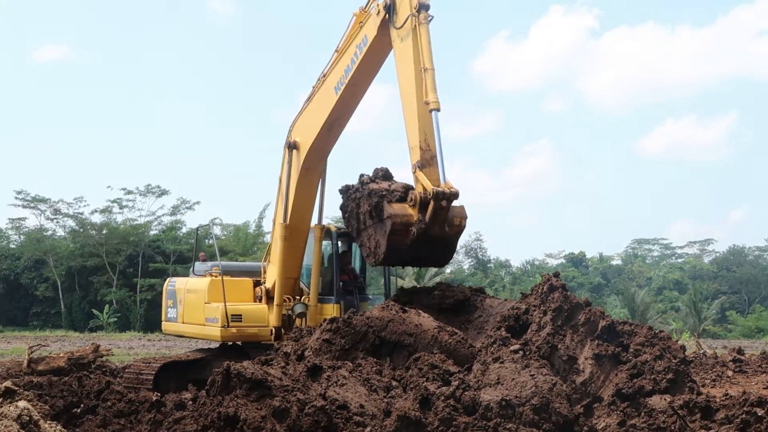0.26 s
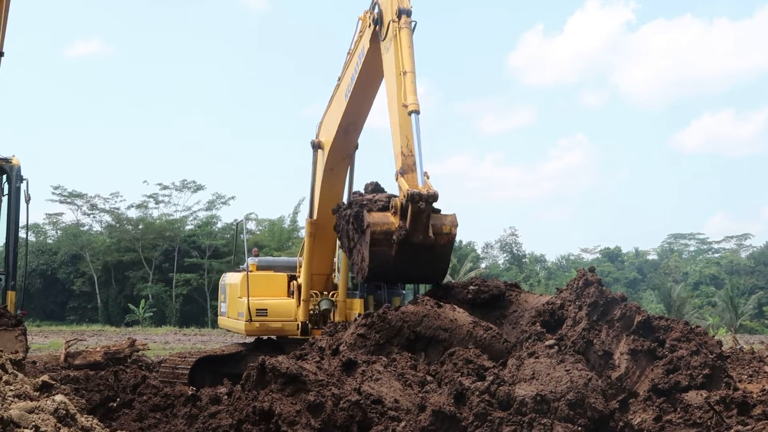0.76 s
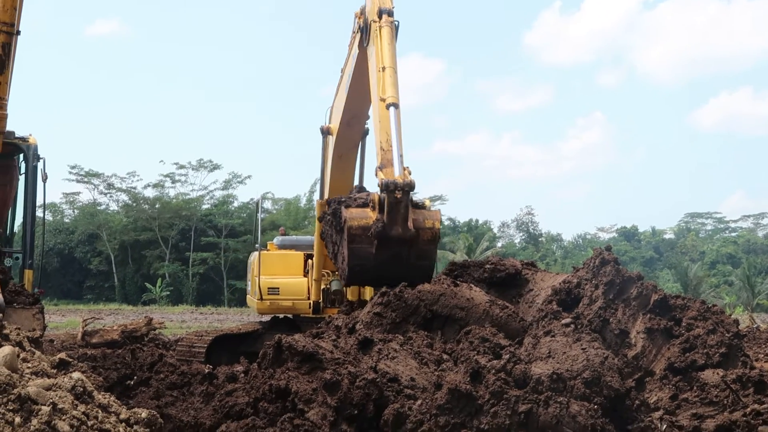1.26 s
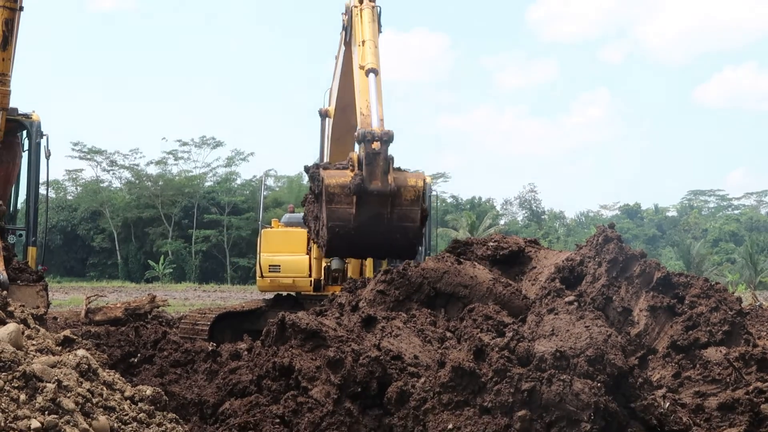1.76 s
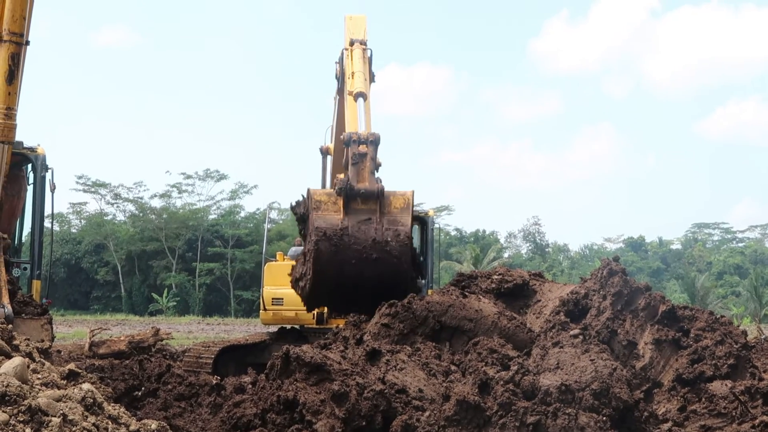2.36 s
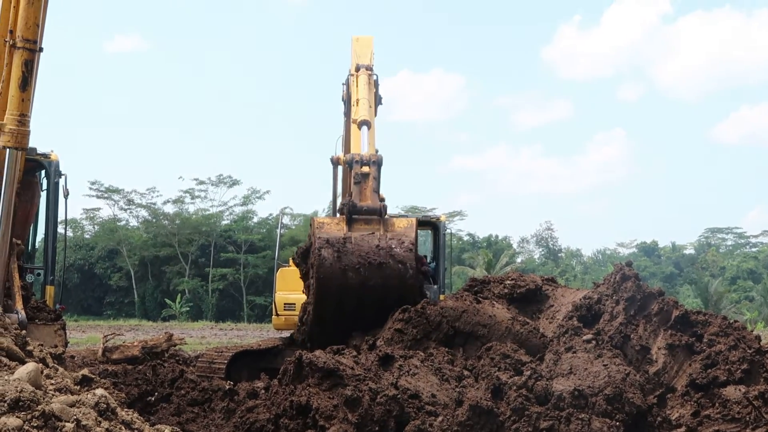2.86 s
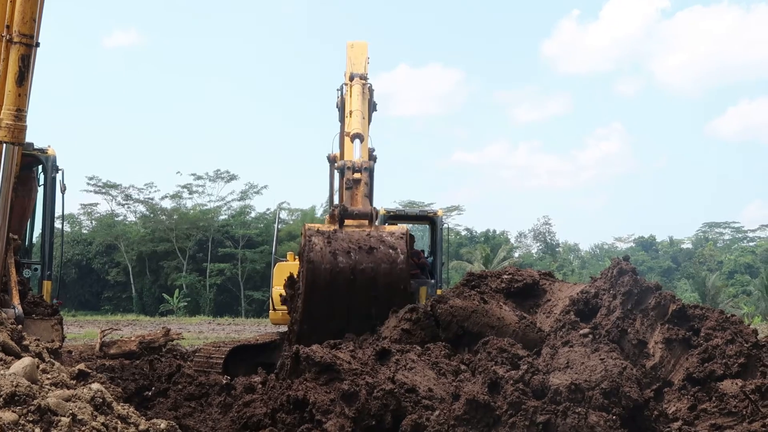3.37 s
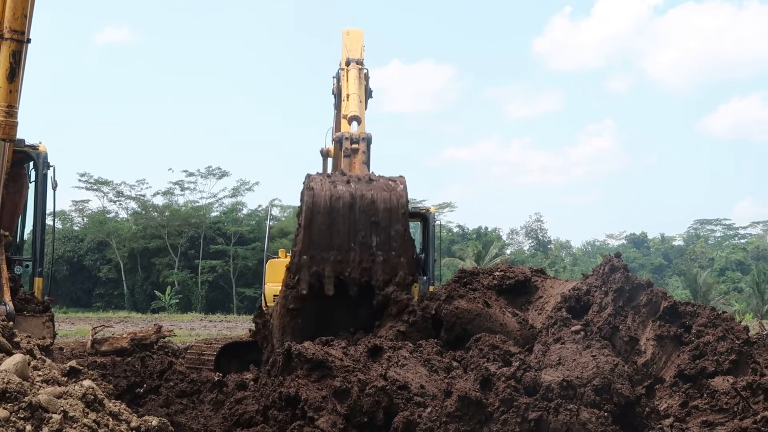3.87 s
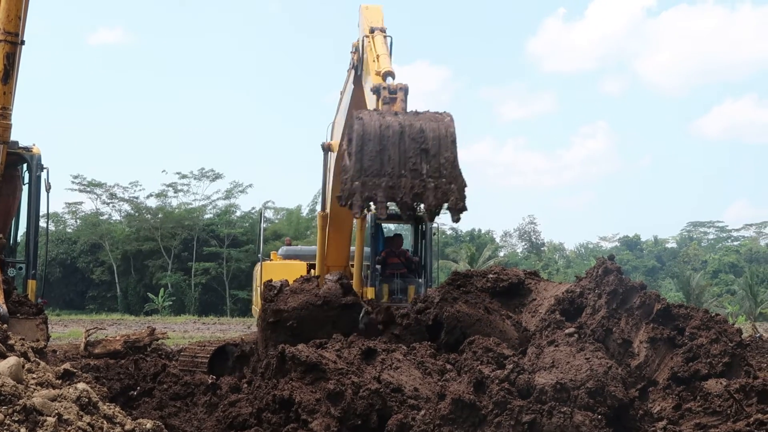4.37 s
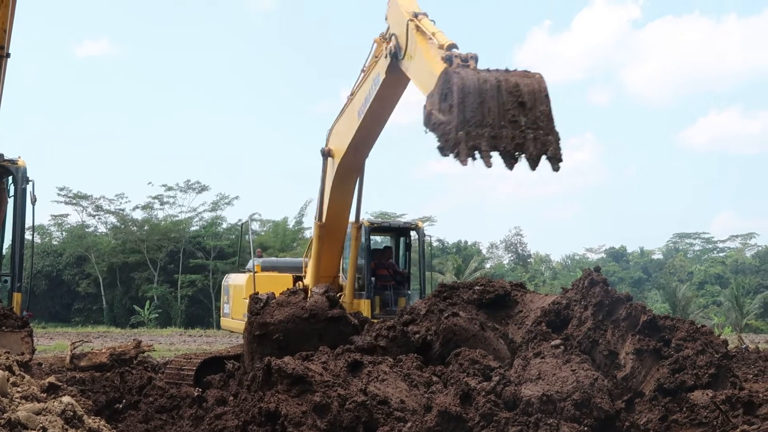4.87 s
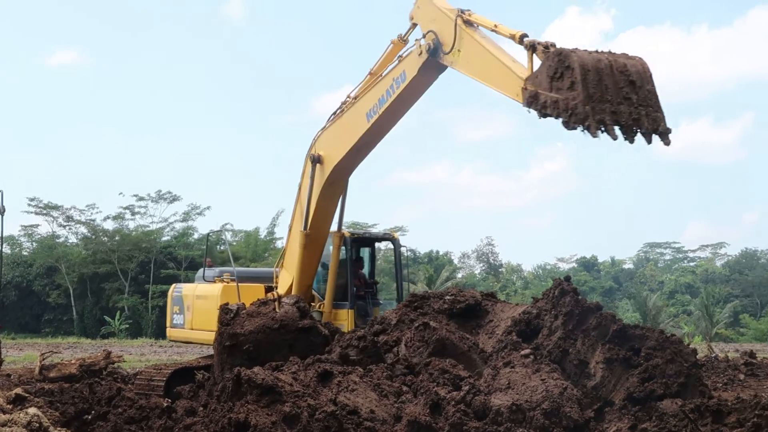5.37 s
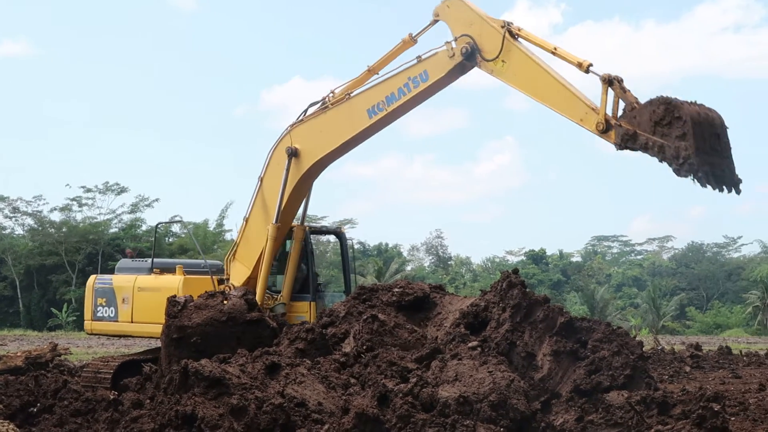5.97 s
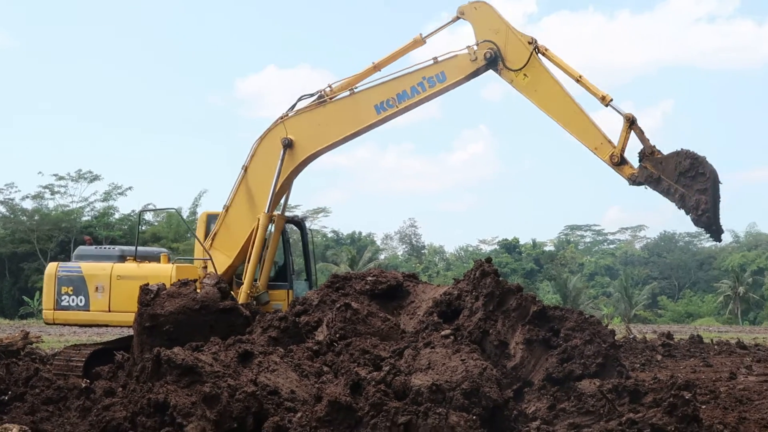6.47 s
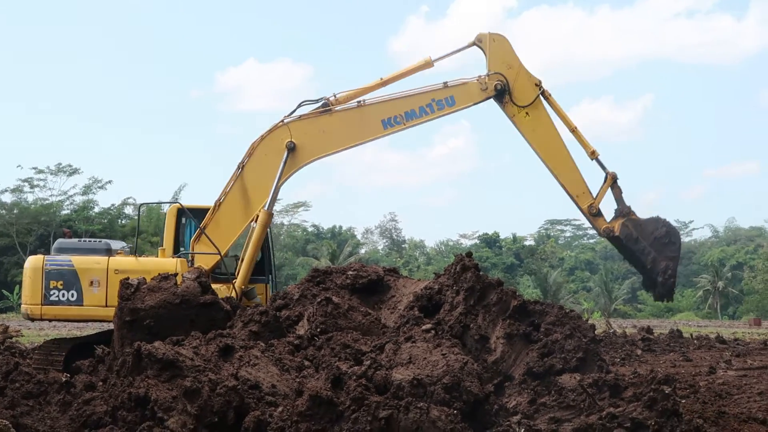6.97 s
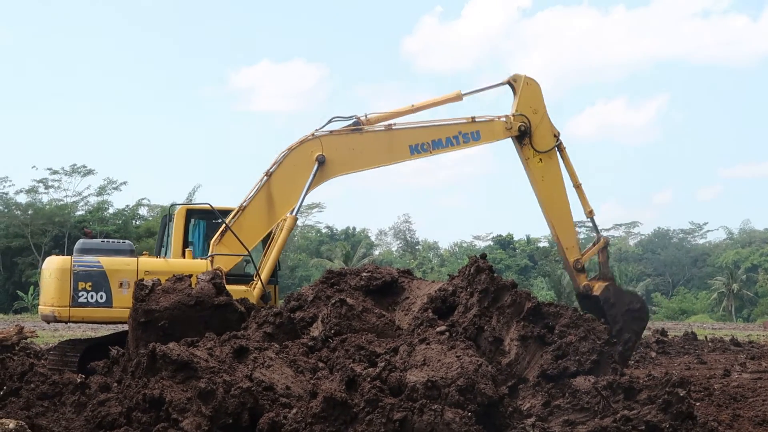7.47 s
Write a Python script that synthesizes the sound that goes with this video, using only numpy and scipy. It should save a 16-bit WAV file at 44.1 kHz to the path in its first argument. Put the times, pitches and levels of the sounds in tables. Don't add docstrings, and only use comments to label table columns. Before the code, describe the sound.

Outdoors in an open field, a working diesel excavator growls continuously about twenty metres away. Pump whine wavers in pitch over a broad roar of fan, panels and hissing oil. A hard steel knock with a rattle comes just after half a second, a second clank near four seconds. Low soil thuds recur, a neighbouring machine hums and whistles, and a small bird chirps. Stereo microphone, dry open air, treble spread wide.

```python
import sys
import numpy as np
from scipy import signal
from scipy.fft import rfft, irfft, next_fast_len
from scipy.io import wavfile
from scipy.ndimage import uniform_filter1d

SR = 44100
rng = np.random.default_rng(int(sys.argv[2]) if len(sys.argv) > 2 else 0)


def store_pcm(level_fs):
    pcm = np.round(np.clip(level_fs, -1, 1) * 32767).astype(np.int16)
    wavfile.write(sys.argv[1], SR, np.atleast_2d(pcm).T)


def amplitude_ratio(level_db):
    exponent = np.asarray(level_db, float) / 20
    return 10 ** exponent


N = 340893

# (time [s], pitch [Hz])
PUMP_PITCH = [(0, 577), (1.12, 561.4), (1.28, 588), (1.42, 598), (2.08, 582), (2.24, 598), (2.5, 567),
              (3.4, 548.8), (3.64, 586.3), (3.92, 602.4), (4.2, 568.7), (5.55, 568.5), (6.05, 584),
              (6.55, 574), (6.8, 592.2), (6.95, 578), (7.3, 569.5), (7.48, 604.6)]
GEAR_RATIO = 1 / 1.837
# (time [s], level [dB])
FIRING_LEVEL = [(0, -21), (.28, -26.5), (.42, -35), (.56, -27.5), (1.12, -33.5), (1.3, -20), (2.3, -20.5),
                (2.52, -31), (2.94, -28), (3.1, -46), (3.38, -40), (3.64, -19), (4.06, -21.5), (4.2, -35),
                (4.42, -24.5), (6.05, -27), (6.44, -26.5), (7.73, -16.5)]
# (start [s], end [s], level [dB])
BARKS = [
    (.6, 2.15, -34.5),
    (2.3, 2.95, -31.5),
    (3.05, 3.95, -32),
    (4.0, 5.68, -30.5),
    (7.4, 7.9, -31),
]
# (start [s], end [s], level [dB])
PISTON_STROKES = [(.12, .38, -27.5), (.86, 1.2, -28.5), (1.13, 2.2, -28), (2.2, 2.31, -39),
                  (2.72, 3.0, -42), (1.74, 1.95, -26), (2.33, 2.68, -27.5), (3.05, 3.3, -38),
                  (3.29, 3.5, -32), (3.56, 3.87, -31.5), (3.85, 4.14, -36), (4.12, 4.85, -35),
                  (5.07, 5.47, -32.5), (4.8, 5.78, -42), (6.5, 6.7, -44)]
# (start [s], end [s], level [dB])
GEAR_STROKES = [(.42, .6, -24), (1.18, 2.45, -25), (2.45, 3.5, -33.5), (3.48, 4.0, -25), (4.1, 4.55, -31.5),
                (4.97, 5.26, -23.5), (5.25, 5.95, -33.5), (6.1, 6.36, -27.5), (6.33, 6.82, -22.5),
                (6.92, 7.35, -26), (7.62, 7.9, -24.5)]
# (start [s], end [s], multiple of pump pitch, level [dB])
PUMP_OVERTONES = [(1.5, 1.69, 1.5, -41), (1.9, 2.12, 1.5, -41), (2.4, 2.7, 1.5, -42), (1.5, 2.2, 2, -48),
                  (2.83, 3.1, 2, -44), (3.1, 3.45, 2, -47), (3.62, 3.95, 2, -44), (4.2, 5.75, 4.5, -49),
                  (4.3, 6.1, 2.5, -51), (4.2, 5.05, 3, -46), (4.5, 6.02, 5, -54), (0, .21, 4.5, -44),
                  (1.2, 1.98, 4.5, -53)]
BARK_REST_DB, PISTON_REST_DB, GEAR_REST_DB, STROKE_EDGE_S = -51, -42.5, -33.5, 0.059

# (time [s], level [dB])
HOOD_SHADE = [(0, 2.5), (.5, -1), (1.2, -4.5), (2.2, -5.5), (2.6, -7), (4.1, -7.5), (4.65, -4), (5.6, -2.5),
              (6.5, 0), (7.73, 1)]
# (time [s], level [dB])
OIL_FLOW = [(0, -0.5), (.45, 0.5), (1.2, 4), (1.66, 4.5), (2.2, 1), (2.4, -9), (2.58, -10.5), (2.68, -3.5),
            (3, 0), (3.2, -1.5), (3.4, -11.5), (3.83, -10), (4.05, -20), (4.24, -10.5), (4.65, -9),
            (5.7, -3), (6.54, -1.5), (7.73, 2.5)]
# (panels [dB/dB], clatter [dB/dB], fan [dB/dB], hiss [dB/dB])
ROAR_FOLLOWS = [(0.42, 0.92, 0.32, 0.088), (0.066, .05, 0.38, 0.97)]
# (panels [dB], clatter [dB], fan [dB], hiss [dB])
ROAR_LEVEL = [0.5, 2, 2.5, 0]
# (panels [Hz], clatter [Hz], fan [Hz], hiss [Hz])
ROAR_CENTRES = [400, 1500, 6000, 11500]
# (time [s], level [dB])
FLANK_WORK = [(0, 0.5), (1.2, -7.5), (1.5, 1), (3.3, 4.5), (3.9, -4), (4.3, -5), (5, -2), (6.3, 0),
              (7.3, 7)]
# (clatter [dB/dB], fan [dB/dB], hiss [dB/dB])
FLANK_FOLLOWS = [.1, .4, 0.84]
# (clatter [dB], fan [dB], hiss [dB])
FLANK_LEVEL = [3.5, -3.5, 2.5]
# (frequency [Hz], level per Hz [dB])
PANEL_BOOM = [(30, -19.5), (45, -12), (75, -2.5), (120, -5), (160, -6.5), (215, -8.5), (280, -5),
              (380, -8.5), (460, -12), (560, -18)]
# (frequency [Hz], level per Hz [dB])
RUSH_COLOUR = [(740, -24), (1000, -18), (1650, -21.5), (2100, -32.5), (2650, -27), (3300, -37), (3900, -36),
               (5500, -43), (8000, -50.5), (12000, -58.5), (15100, -63.5), (15900, -74)]
# (frequency [Hz], width [Hz], boost [dB])
RUSH_PEAKS = [(310, 34, 2.5), (1604, 51, 2.5), (2523, 53, 0), (3800, 500, 2), (7200, 300, 0.5),
              (8590, 470, 5.5), (9900, 370, 2.5), (11070, 450, 7.5), (12250, 430, 7), (13600, 600, 7),
              (14700, 700, 13)]
# (frequency [Hz], side minus middle [dB])
STEREO_SPREAD = [(60, -47), (110, -31), (200, -26), (380, -20.5), (700, -23.5), (1290, -26.5), (2380, -15),
                 (4400, -4.5), (8120, 1), (15000, 3)]

# (time [s], level [dB])
HUM_LEVEL = [(0, -37), (.3, -32), (3.9, -33.5), (4.6, -30), (5.75, -31), (6.54, -38), (7.08, -36),
             (7.5, -35)]
# (frequency [Hz], level [dB])
HUM_TONES = [
    (52.5, -1),
    (105, 0),
    (173, -2.5),
]
# (time [s], pitch [Hz])
TURBO_PITCH = [(0, 5500), (2, 5540), (3.4, 5440), (3.75, 5800), (4.2, 6140), (4.55, 6250), (4.9, 6000),
               (5.4, 5640), (6.2, 5450)]
TURBO_DB, TURBO_DB_PER_KHZ = -76, 7

# (time [s], level [dB], starting pitch [Hz])
BIRD_NOTES = [(.04, -52, 4350), (.31, -47, 4360), (2.325, -51, 4400), (2.599, -50, 4300),
              (2.895, -48, 4289), (3.21, -46, 4455), (3.515, -46, 4310), (3.9, -53, 4155),
              (4.235, -53, 4100), (4.585, -48, 4150), (4.93, -47.5, 4300), (5.25, -44, 4230),
              (5.6, -45.5, 4350), (5.9, -42.5, 4302), (6.28, -47, 4300), (6.6, -54, 4334),
              (7.655, -47, 4200)]
CHIRP_FALL = .14
# (time [s], pitch [Hz], level [dB], time to fade by 60 dB [s])
CLODS = [(0.131, 88, -12.5, 0.33), (2.1, 84, -18, 0.27), (2.03, 81.5, -15.5, .3), (3.6, 72, -24, 0.39),
         (3.85, 90, -12, 0.33), (5.05, 72, -20, 0.49), (5.97, 72, -20.5, 0.81), (7.58, 75, -17.5, 0.77),
         (2.9, 62, -23, 0.17), (0.34, 69.4, -23, 0.36), (7.1, 72, -21, 0.22), (6.88, 75, -19, .2)]

# (start [s], end [s], start pitch [Hz], end pitch [Hz], level [dB])
OIL_WHISTLES = [
    (2.8, 3.9, 915, 905, -46),
    (1.35, 1.62, 1100, 1095, -44),
    (4.25, 6.6, 10950, 10900, -66),
    (2.26, 2.49, 15200, 14300, -46),
    (.38, .47, 14700, 14000, -55),
    (1.1, 2.2, 7080, 7100, -63),
    (.31, .43, 390, 380, -28),
    (3.8, 4.7, 10100, 9900, -78),
    (4.5, 5.05, 1550, 1545, -46),
    (5.3, 6.3, 9600, 9550, -72),
]
WHISTLE_BREADTH = .03

# (time [s], thump [dB], crack [dB], arm rattle [dB], rattle decay [s])
PIN_KNOCKS = [
    (.5845, 3, 4, -3.5, 0.025),
    (.635, -42, -45, -10.5, 0.077),
    (3.9348, -6, -6.5, -15, 0.055),
    (3.246, -37, -22, -13.5, 0.028),
    (3.283, -40, -28, -17, 0.048),
    (.345, -12, -25, -13, .05),
    (2.8, -29, -44, -24, .08),
    (2.85, -25, -48, -23, 0.092),
    (6.6, -32, -20, -28, .03),
]
# (frequency [Hz], width [Hz], level [dB])
ARM_RINGS = [
    (190, 160, -1.5),
    (1120, 300, -7.5),
    (1520, 365, -1),
    (2850, 280, -8),
    (4200, 910, -24),
]
SLAP_DB, SLAP_S = -47, 0.055

# (time [s], depth [dB])
LEVEL_DIPS = [
    (.592, -7),
    (3.94, 0.5),
]
DIP_ATTACK_S, DIP_RELEASE_S = .02, 0.62

T = np.arange(N) / SR
SIZE = next_fast_len(N)
HZ = np.maximum(np.arange(SIZE // 2 + 1) * SR / SIZE, 1)


def curve(table):
    times, values = np.transpose(table)
    return np.interp(T, times, values)


def over_hz(table):
    hz, db = np.transpose(table)
    return amplitude_ratio(np.interp(np.log(HZ), np.log(hz), db))


def walk(rate):
    hold = int(SR / rate)
    steps = np.repeat(rng.standard_normal(N // hold + 1), hold)
    smooth = uniform_filter1d(uniform_filter1d(steps, hold), hold)
    return 1.3 * smooth[:N]


def tone(hz):
    return np.sqrt(2) * np.sin(2 * np.pi * np.cumsum(hz * np.ones(N)) / SR)


def ring(x, hz, width):
    return signal.lfilter(*signal.iirpeak(hz, hz / width, fs=SR), x)


def progress(start, end):
    return np.clip((T - start) / (end - start), 0, 1)


def swell(start, end):
    return np.sin(np.pi * progress(start, end)) ** .5


def strokes(table, rest_db):
    gain = amplitude_ratio(rest_db)
    for start, end, db in table:
        gain = gain + amplitude_ratio(db) * np.clip(np.minimum(T - start, end - T) / STROKE_EDGE_S, 0, 1)
    return gain


def exhaust(firing):
    beat = amplitude_ratio(curve(FIRING_LEVEL) + 2.2 * walk(15)) * tone(firing)
    bark = strokes(BARKS, BARK_REST_DB) * amplitude_ratio(1.2 * walk(8)) * tone(2 * firing)
    return beat + bark


def piston_pump(pump_hz):
    hz = pump_hz * (1 + .003 * walk(30))
    out = strokes(PISTON_STROKES, PISTON_REST_DB) * amplitude_ratio(2.6 * walk(18)) * tone(hz)
    for start, end, multiple, db in PUMP_OVERTONES:
        multiple = np.round(2 * multiple) / 2
        out += amplitude_ratio(db + 2.5 * walk(20)) * swell(start, end) * tone(multiple * hz)
    return out


def gear_pump(pump_hz):
    hz = GEAR_RATIO * pump_hz * (1 + 0.0039 * walk(20))
    octave = amplitude_ratio(-22 + 2.7 * walk(8.6)) * tone(2 * hz)
    return strokes(GEAR_STROKES, GEAR_REST_DB) * amplitude_ratio(1.9 * walk(16)) * (tone(hz) + octave)


def roar(firing):
    controls = np.array([curve(HOOD_SHADE), curve(OIL_FLOW)])
    levels = np.transpose(ROAR_FOLLOWS) @ controls + np.array(ROAR_LEVEL)[:, None]
    flank = np.outer(FLANK_FOLLOWS, curve(FLANK_WORK)) + np.array(FLANK_LEVEL)[:, None]
    flank = np.vstack([levels[:1], flank])
    both = np.array([levels, flank])

    cycle = np.cumsum(firing) / SR
    puff = 1 + 0.094 * np.cos(2 * np.pi * cycle) + 0.041 * np.cos(np.pi * cycle)
    noise = rfft(rng.standard_normal((2, N)), SIZE) * over_hz([*PANEL_BOOM, *RUSH_COLOUR])
    noise[0] *= amplitude_ratio(sum(db / (1 + (2 * (HZ - hz) / width) ** 2) for hz, width, db in RUSH_PEAKS))
    noise[1] *= over_hz(STEREO_SPREAD)

    out = np.zeros((2, N))
    surge = walk(6)
    for hz in 30 * 2 ** np.arange(0, 9.5, .75):
        share = np.cos(np.pi * np.clip(np.log2(HZ / hz) / 1.5, -.5, .5)) ** 2
        place = np.interp(np.log(hz), np.log(ROAR_CENTRES), np.arange(4))
        blend = np.maximum(1 - np.abs(np.arange(4) - place), 0)
        db = blend @ both + .5 * surge + 1.1 * walk(11)
        band = irfft(noise * share, SIZE)[:, :N] * amplitude_ratio(db)
        out += band * (puff if 600 < hz < 4000 else 1)
    return out


def neighbour_hum():
    level = curve(HUM_LEVEL)
    out = 0
    for hz, db in HUM_TONES:
        out = out + amplitude_ratio(db + level + 2.2 * walk(5.4)) * tone(hz + 0.29 * walk(2.87))
    return out


def neighbour_turbo():
    hz = curve(TURBO_PITCH)
    db = TURBO_DB + TURBO_DB_PER_KHZ * (hz / 1000 - 5.5)
    hz = hz * (1 + .003 * walk(43))
    return amplitude_ratio(db + 2.5 * walk(20)) * (tone(hz) + amplitude_ratio(-12) * tone(2 * hz))


def bird():
    song = 0
    husk = 1 + .007 * walk(250)
    for start, db, hz in BIRD_NOTES:
        along = np.clip((T - start) / 0.052, 0, 1)
        glide = along ** 0.793 + .5 * along ** 6
        shape = along ** 0.43 * np.sin(np.pi * along) ** .6 * 1.7
        song = song + amplitude_ratio(db) * shape * tone(hz * (1 - CHIRP_FALL * glide) * husk)
    song = song * amplitude_ratio(2.8 * walk(200))
    trees = rng.standard_normal((2, 9000)) * np.exp(-T[:9000] / 0.12)
    ahead, flank = signal.fftconvolve(song[None], trees, axes=1)[:, :N]
    return amplitude_ratio(-3) * song + amplitude_ratio(-37) * ahead, amplitude_ratio(-35 - 1.1 * T) * flank


def clod_thuds():
    out = 0
    for start, hz, db, fade in CLODS:
        age = np.maximum(T - start, 0)
        onset = 1 - np.exp(-age / 0.022)
        out = out + amplitude_ratio(db - 60 * age / fade) * onset * 2.44 * np.sin(2 * np.pi * hz * age)
    return out


def oil_whistles():
    out = 0
    for start, end, hz0, hz1, db in OIL_WHISTLES:
        breath = 0.49 + walk(WHISTLE_BREADTH * hz0)
        hz = hz0 + (hz1 - hz0) * progress(start, end)
        out = out + amplitude_ratio(db) * swell(start, end) * breath * tone(hz)
    return out


def pin_knocks():
    thump, steel = np.zeros(N), np.zeros(N)
    grit = rng.standard_normal(N) * amplitude_ratio(2.9 * walk(250))
    for start, thump_db, crack_db, rattle_db, decay in PIN_KNOCKS:
        age = np.maximum(T - start, 0)
        thump -= amplitude_ratio(thump_db) * np.sin(2 * np.pi * np.clip((age / 0.00354) ** 0.82, 0, 1)) * 1.17
        thump -= amplitude_ratio(thump_db - 7.5) * np.exp(-((T - start - .006) / 0.0013) ** 2)
        steel += amplitude_ratio(crack_db) * (T > start) * 3.7 * np.exp(-age / 0.00013)
        steel += amplitude_ratio(rattle_db) * grit * np.exp(-age / decay) * (1 - np.exp(-age / 0.0026))
    blow = thump + sum(amplitude_ratio(db) * ring(steel, hz, width) for hz, width, db in ARM_RINGS)
    return signal.sosfilt(signal.butter(4, 3000, fs=SR, output="sos"), blow)


def heap_echo(blows):
    heaps = rng.standard_normal(9000) * np.exp(-T[:9000] / SLAP_S) * (T[:9000] > .01)
    return amplitude_ratio(SLAP_DB) * ring(signal.fftconvolve(blows, heaps)[:N], 1800, 2500)


def scene():
    pump_hz = curve(PUMP_PITCH)
    firing = pump_hz / 6 * (1 + .004 * walk(12))
    engine = exhaust(firing) + piston_pump(pump_hz) + gear_pump(pump_hz)
    rush, diffuse = roar(firing)
    turbo = neighbour_turbo()
    song, tree_echo = bird()
    blows = pin_knocks()

    mid = engine + rush + neighbour_hum() + .4 * turbo
    mid = mid + song + clod_thuds() + oil_whistles() + blows
    late = irfft(rfft(mid, SIZE) * over_hz(STEREO_SPREAD) * -1j, SIZE)[:N]
    side = 0.66 * late + 0.79 * diffuse + tree_echo + heap_echo(blows) + turbo
    return np.array([mid + side, mid - side])


def roll_off(x):
    return signal.sosfilt(signal.butter(12, 15610, fs=SR, output="sos"), x)


def record(dry):
    for start, db in LEVEL_DIPS:
        age = np.maximum(T - start, 0)
        dip = (1 - np.exp(-age / DIP_ATTACK_S)) * np.exp(-(age / DIP_RELEASE_S) ** 2)
        dry = dry * amplitude_ratio(db * dip)
    return roll_off(np.clip(dry, -.99, .99))


dry = scene()
out = record(dry)
store_pcm(out)
```